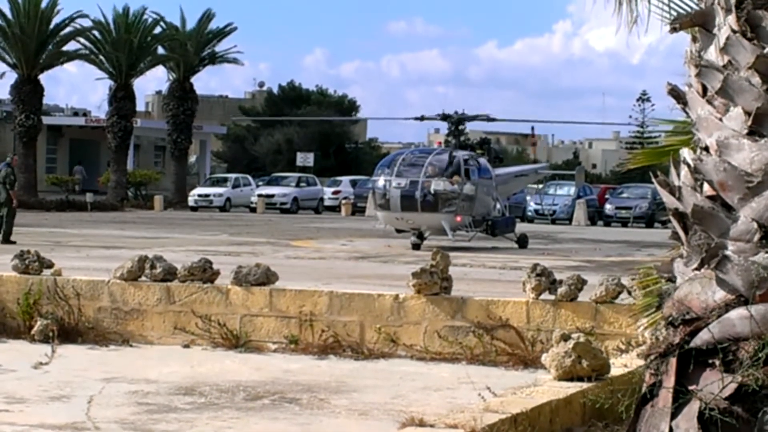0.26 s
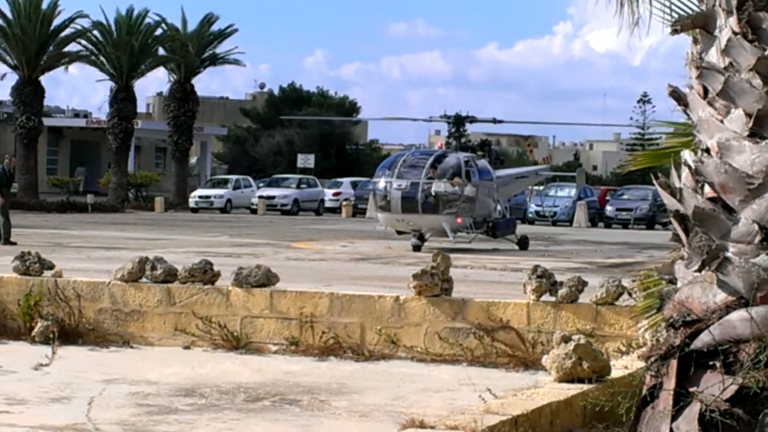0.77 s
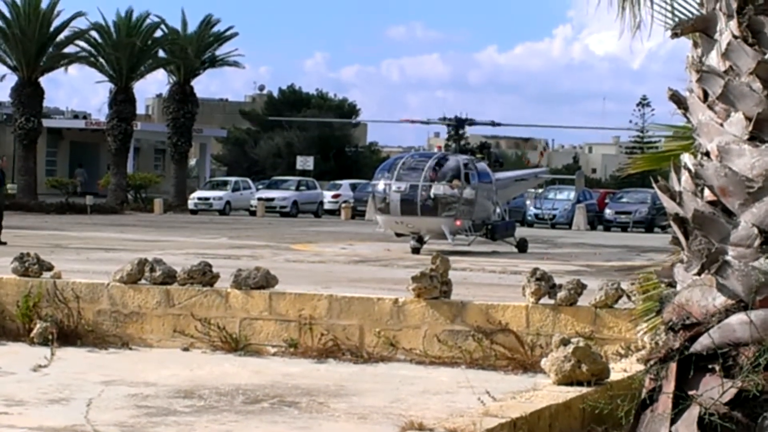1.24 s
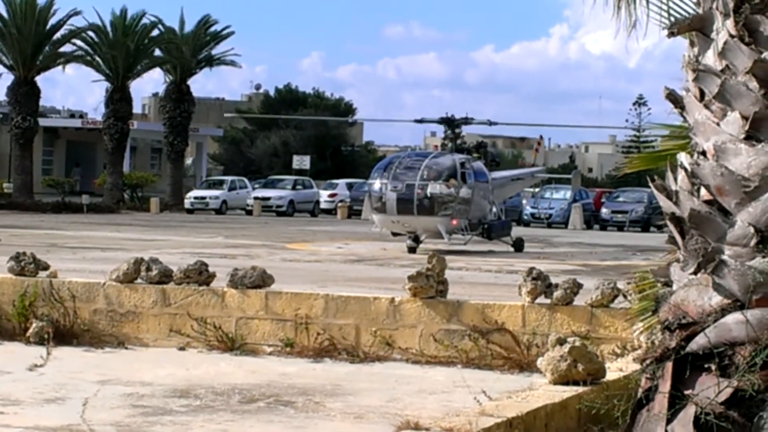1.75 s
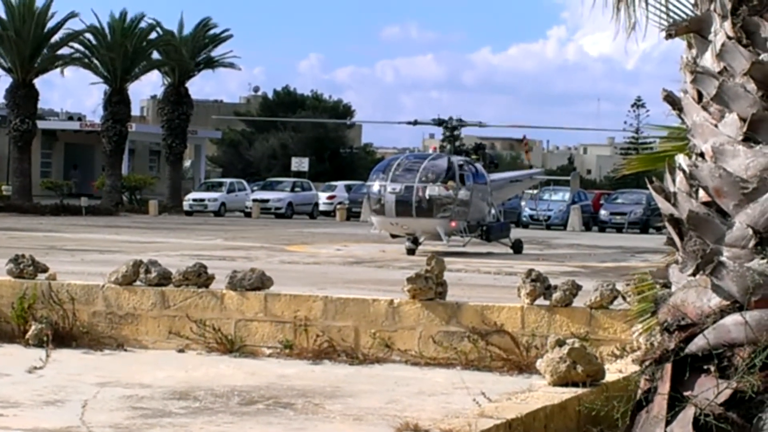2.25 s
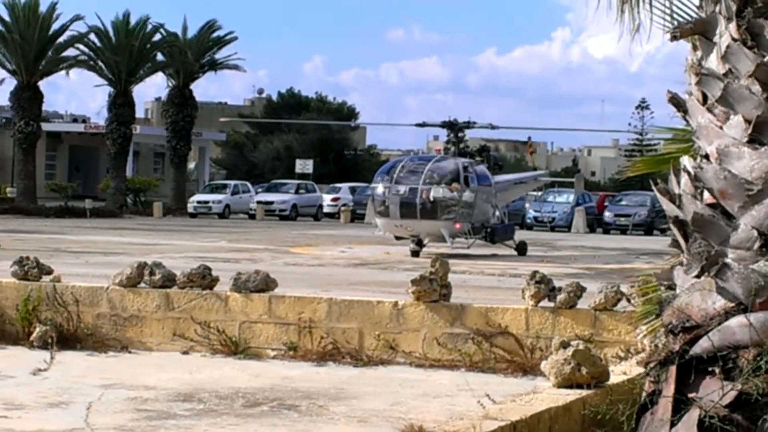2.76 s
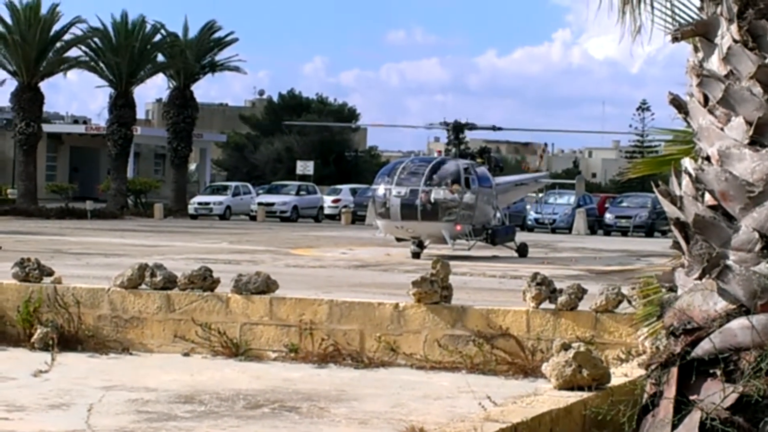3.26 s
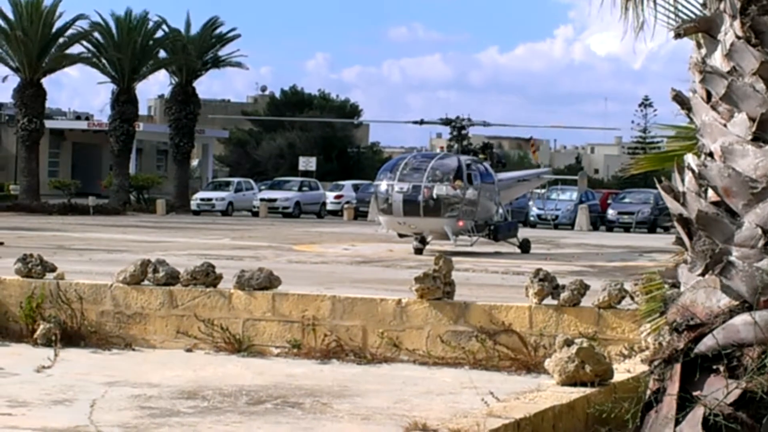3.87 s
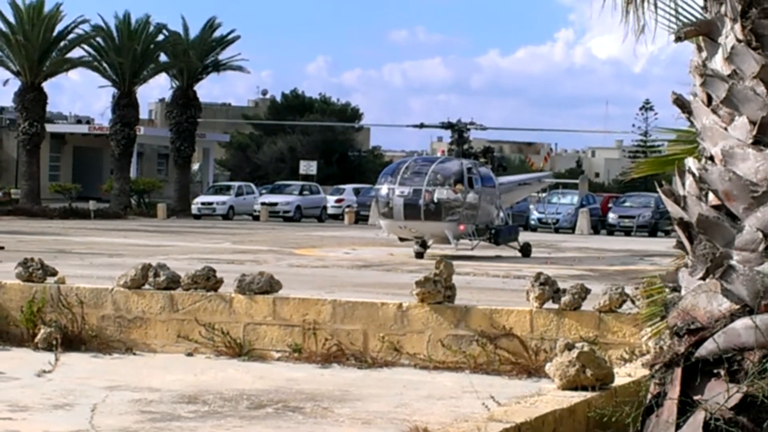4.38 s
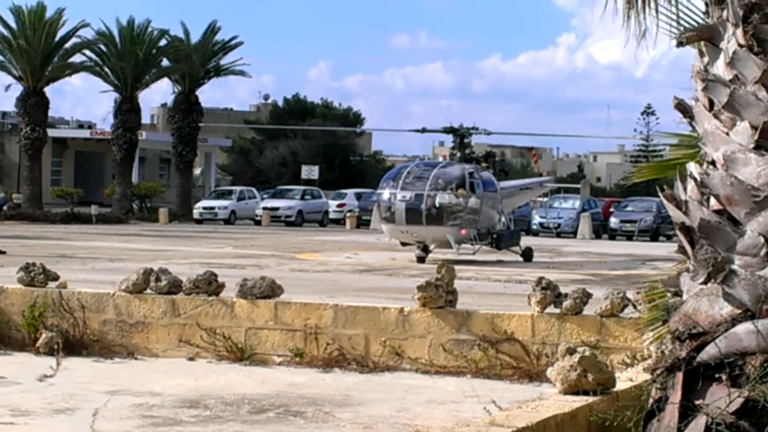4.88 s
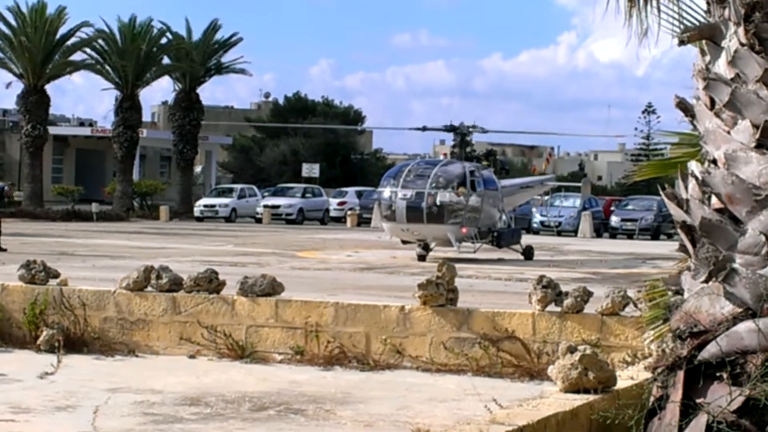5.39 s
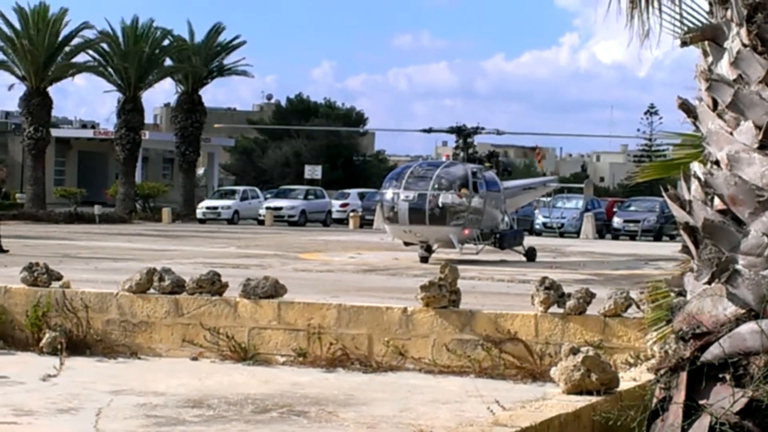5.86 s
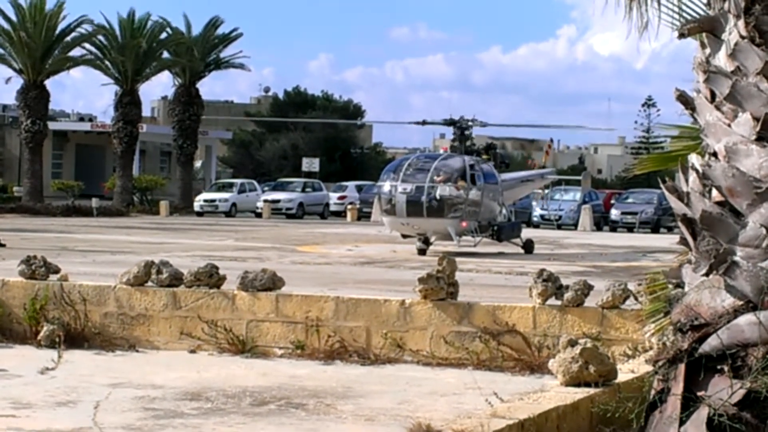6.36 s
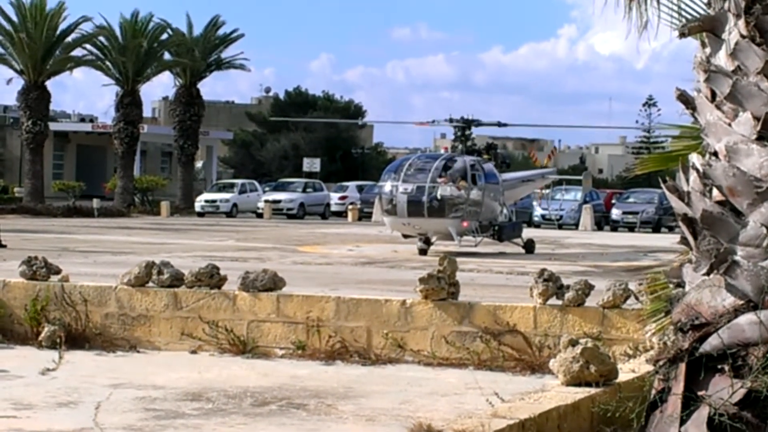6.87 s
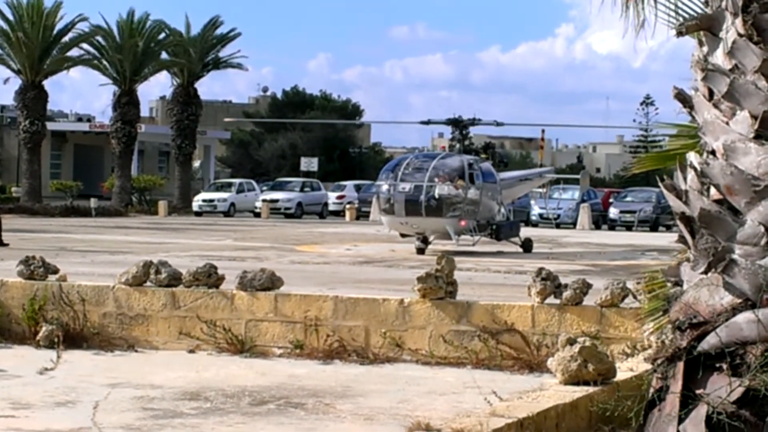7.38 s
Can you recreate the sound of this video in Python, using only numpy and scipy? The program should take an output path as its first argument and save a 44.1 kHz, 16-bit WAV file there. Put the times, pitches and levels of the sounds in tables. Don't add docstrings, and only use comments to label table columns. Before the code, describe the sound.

Continuous turbine whine from a grounded helicopter, near five kilohertz, thin and shrill, with fainter steady tones above and below. A hissing, roaring airflow fills the space beneath it. About eight to eleven times a second, a rotor blade throws back a short downward-sweeping echo. Gusts and hot air make the whine shimmer and fade. Open car park, small distant microphone, slightly coloured by reflections, no deep thumping.

```python
import sys
import numpy as np
from scipy import signal
from scipy.fft import rfft, irfft, next_fast_len
from scipy.io import wavfile
from scipy.ndimage import uniform_filter1d

SR = 44100
rng = np.random.default_rng(int(sys.argv[2]) if len(sys.argv) > 2 else 0)


def unload_audio(sound):
    columns = np.transpose(np.atleast_2d(sound))
    steps = np.round(np.clip(columns, -1, 1) * 32767)
    wavfile.write(sys.argv[1], SR, steps.astype(np.int16))


def amplitude_ratio(level_db):
    exponent = np.asarray(level_db, float) / 20
    return 10 ** exponent


N = 336483
PAD = next_fast_len(N)
TIME = np.arange(N) / SR
THIRDS = [0, TIME[-1] / 2, TIME[-1]]  # start, middle and end in s
SLOW_SR = 1050
SLOW = np.arange(int(TIME[-1] * SLOW_SR) + 2) / SLOW_SR


def whine(turns):
    # [t/s, level/dB]
    blade_tone = [(0.0, -14.0), (0.17, -19.5), (0.95, -10.0), (1.6, -7.5), (2.7, -12.0), (2.75, -17.5),
                  (3.79, -25), (3.92, -16.5), (5.12, -14.0), (5.18, -21), (5.82, -13.0), (6.39, -11.5),
                  (7.4, -32), (7.63, -18.0)]
    # [t/s, half length/s, level/dB]
    eddies = [(0.47, 0.061, -3.5), (0.6, 0.099, 3), (0.87, 0.027, -2.0), (1.1, 0.055, -2.5),
              (1.58, 0.1, -4.5), (1.62, 0.044, 5), (1.81, 0.049, 2.0), (2.19, 0.038, 2.5),
              (2.35, 0.051, -2.0), (3.17, 0.16, 9), (3.24, 0.033, -5.5), (3.56, 0.027, 11),
              (3.67, 0.034, 7.5), (4.18, 0.025, 3), (4.38, 0.13, -4), (4.52, 0.038, -4.5),
              (4.68, 0.03, 2.5), (4.98, 0.048, -5.5), (5.35, 0.057, 5.5), (5.71, 0.076, 4.0),
              (6.08, 0.041, 2.5), (6.35, 0.018, -6), (6.62, 0.027, 3.5), (6.82, 0.036, 6.5),
              (6.94, 0.028, 4.5), (7.03, 0.021, 7.5), (7.15, 0.052, 8.5), (7.42, 0.07, 14.0),
              (4.31, .03, -3), (7.3, .05, -6)]
    # [multiple of shaft, level at start/dB, level at end/dB]
    upper_tones = [
        (16, -46, -44.5),
        (22, -61, -55.5),
    ]
    lower_tones = [(2, -63, -60.5), (3, -54, -47.5), (4, -51, -51), (5, -43.5, -46), (8, -46, -49)]
    # [t/s, half length/s, level/dB, multiple of shaft]
    upper_fades = [(0.24, 0.14, -10, 16), (1.3, 0.059, -12, 16), (1.757, 0.254, 8.5, 16),
                   (1.755, 0.095, -17, 16), (2.81, 0.29, 5, 16), (3.12, 0.084, -5.5, 16),
                   (3.669, 0.28, 5, 16), (4.14, 0.36, -6, 16), (4.825, 0.11, 6.5, 16),
                   (5.24, 0.062, -7.5, 16), (5.41, 0.046, 5.5, 16), (5.79, 0.05, -8, 16),
                   (6.08, 0.183, -12, 16), (6.3, 0.35, 8.5, 16), (7.16, 0.109, -2, 16), (7.5, 0.2, 6, 16),
                   (0.63, 0.13, 8, 22), (1.094, 0.19, 11.5, 22), (1.59, 0.18, 10.5, 22),
                   (1.93, 0.05, 10.5, 22), (2.473, 0.32, 7.5, 22), (2.85, 0.046, -13, 22),
                   (3.29, 0.188, 8.5, 22), (3.69, 0.048, 8, 22), (4.1, 0.116, -7, 22), (4.66, 0.058, 5, 22),
                   (5.462, 0.045, 7, 22), (5.8, 0.04, 6.0, 22), (5.93, 0.046, 7, 22), (6.23, 0.21, 8.5, 22)]
    lower_fades = [(3.95, 1, 11, 2), (5.4, 0.45, 7, 2), (7.5, .4, 6, 2), (0, .15, -12, 3),
                   (3.09, 0.85, 7.5, 3), (4.75, .31, -3, 3), (6.38, .34, -15, 3), (7.54, .15, 3, 3),
                   (.48, .18, -4.5, 4), (2.15, .23, 3, 4), (3.29, .27, 5, 4), (4.45, .11, 6, 4),
                   (5.67, .3, -3, 4), (7.62, .8, 6.5, 4), (.52, .48, -9.5, 5), (2.1, .64, -6, 5),
                   (2.71, .19, 5, 5), (3.95, .15, 4.5, 5), (4.27, .12, -3, 5), (5.02, .11, -5, 5),
                   (5.31, .19, 2.5, 5), (6.49, .11, -7, 5), (.03, .28, -10, 8), (.92, .17, 5, 8),
                   (2.31, .11, -12, 8), (2.61, .15, 5, 8), (3.52, .22, 2.5, 8), (4.45, .19, -11, 8),
                   (5.78, .31, -5.5, 8), (7.35, .45, 8, 8)]

    level_db = curve(blade_tone)[0] + np.interp(TIME, SLOW, swells(eddies))
    near = amplitude_ratio(level_db) * (1 + amplitude_ratio(-21) * flutter(width_hz=22))
    scattered = amplitude_ratio(-31.0) * flutter(width_hz=52, shift_hz=29.6)
    scattered = scattered + amplitude_ratio(-32.5) * flutter(width_hz=120, shift_hz=20)
    out = tone(turns, multiple=11) * (near + scattered)

    upper = fading(upper_tones, upper_fades)
    for (multiple, gain), skirt_db, waver in zip(upper, (-14.5, -12), (.3, .45)):
        skirt = amplitude_ratio(skirt_db) * flutter(width_hz=40, shift_hz=16)
        out = out + tone(turns, multiple) * gain * (.95 + waver * flutter(width_hz=12) + skirt)
    for multiple, gain in fading(lower_tones, lower_fades):
        out = out + tone(turns, multiple) * gain * (1.03 + .22 * flutter(width_hz=6))
    return out.real


def blade_echo(turns, hz):
    # [t/s, blades per s]
    rotor = [(0, 7.84), (2, 8.744), (4, 9.536), (6, 10.216), (7.63, 10.687)]
    # [place in the pass 0-1, span/pass, path bend/m, level/dB, phase/turns]
    glints = [
        (-.03, .07, 4.5, 4.5, .15),
        (-.1, .05, 8, -7, .15),
        (.5, .09, 2, -1, 0),
        (.25, .06, 3, -4, .3),
    ]
    # [t/s, lead/turns of blade tone]
    echo_lead = [(0, -.15), (1.9, .46), (2.4, .38), (3.3, .43), (4.2, .04), (5.1, .13), (5.8, -.18),
                 (6.5, -.15), (7.63, 0)]

    coarse = slice(None, None, 8)
    passes = (.378 + np.cumsum(curve(rotor)[0]) / SR)[coarse]
    echo_db = -25.5 - 0.5 * TIME[coarse]
    lead = curve(echo_lead)[0][coarse]
    out = 0
    for centre, span, bend_m, db, phase in glints:
        number = np.round(passes - centre).astype(int)
        chance = rng.standard_normal((number.max() + 1, 2))[number].T
        angle = passes - number - max(centre, 0)
        late = 11 * hz[coarse] * bend_m * angle ** 2 / 343
        flash = np.exp(-((passes - number - centre) / span) ** 2)
        size = flash * amplitude_ratio(echo_db + db + 2.3 * chance[0])
        out = out + size * np.exp(2j * np.pi * (phase + lead + .05 * chance[1] - late))
    out = np.interp(TIME, TIME[coarse], out)
    return (tone(turns, multiple=11) * out * (.95 + .3 * flutter(width_hz=90))).real


def sidelines(turns):
    # [multiple of shaft, early level/dB, middle level/dB, late level/dB]
    orders = [(1.001, -61.5, -54, -46.5), (6, -52.5, -54, -64.5), (6.96, -70, -60.5, -55),
              (9.13, -53, -51.5, -49), (10, -62.5, -49.5, -62), (12, -46, -49, -49), (13, -55, -56, -53.5),
              (14, -50.5, -53, -51), (15.1, -62.5, -58.5, -59), (16.7, -66.5, -69, -65.5),
              (18, -79.5, -76.5, -77), (19, -74, -68.5, -63.5), (20.1, -67.5, -73, -69),
              (21.2, -61.5, -70.5, -80), (23, -70.5, -74.5, -75)]
    out = 0
    for multiple, *db in orders:
        fade = np.interp(TIME, THIRDS, amplitude_ratio(np.array(db))) * (0.95 + 0.5 * flutter(width_hz=1.6))
        out = out + (tone(turns + rng.random(), round(multiple)) * fade).real
    return out


def rush():
    # [f/Hz, level/dB per Hz]
    bed_curve = [(25, -48), (40, -31.5), (55, -17.5), (110, -17), (300, -11.5), (700, -13.5), (1150, -16.5),
                 (2000, -12), (3100, -15), (4800, -8.5), (5900, -15.5), (7200, -25), (8500, -30),
                 (10500, -33)]
    # [delay/s, level/dB, clearest f/Hz, width/Hz]
    walls = [(.0068, -29.5, 497, 1490), (.0113, -20, 500, 1500), (.0297, -16, 3300, 1513),
             (.0325, -9.5, 1875, 1300), (0.0317, -14, 302, 700), (.0343, -14.5, 1880, 1300),
             (.0361, -13, 1900, 1300)]
    # [t/s, level/dB]
    flow = [(0, -3), (0.4, -2.5), (0.65, -1), (1.4, .5), (2.35, 2.5), (3.3, 2), (4.3, 0), (4.8, 0),
            (5.5, -0.3), (6.1, 0), (6.6, -0.5), (7.2, 2), (7.63, 2)]
    band_hz = [300, 1900, 5000, 8300]
    flow_shares = [-0.0049, .7, 1, 1.1]
    # [f/Hz, width/Hz, level over the bed/dB, drift/dB per s]
    flow_humps = [(185, 118, 10, 0), (245.5, 36, 6, 0), (402, 213, 5.5, 0.2), (634, 67, 1.5, 0),
                  (950, 186, 4.5, 0.03), (1247, 190, -3.2, 0.8), (1435, 230, 10, -.05),
                  (1622, 210, 5.5, 0.2), (1862, 100, 2, -1), (2141, 202, 6, -0.56), (2345, 120, 3, -0.2),
                  (2613, 150, 2, -1), (2864, 190, -1, -1.2),
                  (3103, 210, 2.5, -.05), (3520, 190, 4, -0.33), (3785, 170, -2.8, .3),
                    (4200, 400, 1.7, .2), (4526, 340, 8.5, -0.17), (5030, 160, 5.5, .05),
                    (5300, 370, 10, -.45), (5750, 230, 7, -.25), (5980, 180, 2.5, .05), (6430, 510, 5, .1),
                    (7050, 230, -0.3, -.25), (7700, 160, -1, -.3), (8400, 190, 1.2, .05),
                    (9720, 500, 2.5, -.05)]

    hz = np.maximum(np.fft.rfftfreq(PAD, 1 / SR), 1)
    bed_hz, bed_db = np.transpose(bed_curve)
    bed = amplitude_ratio(np.interp(np.log(hz), np.log(bed_hz), bed_db))
    ripple = 1
    for delay_s, db, mid_hz, width_hz in walls:
        reach = (2 * (hz - mid_hz) / width_hz) ** 4
        ripple = ripple + amplitude_ratio(db) * np.exp(-2j * np.pi * hz * delay_s - reach)
    bed = bed * ripple
    bed = bed * (1 - amplitude_ratio(-18.5) * np.exp(-2j * np.pi * hz * 0.003613 - (hz / 3800) ** 4))

    flow_db = np.interp(SLOW, *np.transpose(flow))
    out = 0
    for band, follows in enumerate(flow_shares):
        share = np.interp(np.log(hz), np.log(band_hz), np.arange(4) == band)
        out = out + coloured(bed * np.sqrt(share), follows * flow_db + 0.53 * walk(9))
    for centre_hz, width_hz, db, drift_db in flow_humps:
        bell = np.exp(-(2 * (hz - centre_hz) / width_hz) ** 2)
        breath_db = db + drift_db * (SLOW - THIRDS[1]) + .7 * walk(1.5) + 1.3 * walk(8)
        follows = np.interp(centre_hz, band_hz, flow_shares)
        out = out + coloured(bed * bell, follows * flow_db + breath_db)
    return out * amplitude_ratio(-28) / np.sqrt(np.mean(out ** 2))


def tone(turns, multiple):
    return np.sqrt(2) * np.exp(2j * np.pi * multiple * turns)


def flutter(width_hz, shift_hz=0):
    hz = np.fft.fftfreq(len(SLOW), 1 / SLOW_SR)
    z = rng.standard_normal(len(hz)) + 1j * rng.standard_normal(len(hz))
    z = z / (1 + ((hz - shift_hz) / width_hz) ** 2)
    return np.interp(TIME, SLOW, np.fft.ifft(z) * len(hz) / np.sqrt(np.sum(abs(z) ** 2)))


def fading(levels, fades):
    out = []
    for multiple, first_db, last_db in levels:
        own = [row[:-1] for row in fades if round(row[-1]) == round(multiple)]
        db = np.linspace(first_db, last_db, len(SLOW)) + swells(own)
        out.append((round(multiple), np.interp(TIME, SLOW, amplitude_ratio(db))))
    return out


def swells(rows):
    return sum(db * np.exp(-((SLOW - s) / half_s) ** 2) for s, half_s, db in rows)


def curve(table):
    s, *columns = np.transpose(table)
    return [np.interp(TIME, s, c) for c in columns]


def walk(rate):
    k = int(SLOW_SR / rate)
    held = np.repeat(rng.standard_normal(len(SLOW) // 8), k)[:len(SLOW)]
    return 0.91 * uniform_filter1d(uniform_filter1d(held, k), k)


def coloured(shape, db):
    noise = irfft(shape * np.exp(2j * np.pi * rng.random(len(shape))), PAD)[:N]
    return noise * np.interp(TIME, SLOW, amplitude_ratio(db))


def scene():
    # [t/s, turns per s]
    shaft = [(0, 438.3), (1, 438.1), (2, 438.33), (3, 438.72), (4, 439.12), (5, 439.5), (6, 440.05),
             (7, 440.55), (7.63, 440.8)]
    hz = curve(shaft)[0]
    turns = .02 + np.cumsum(hz) / SR
    return (whine(turns) + blade_echo(turns, hz) + sidelines(turns) + rush())[None]


def top_cut(x):
    return signal.sosfilt(signal.butter(12, 10770, fs=SR, output="sos"), x)


def record(dry):
    edge = np.clip((10500 - np.fft.rfftfreq(PAD, 1 / SR)) / 110 + 1, 0, 1) ** 4
    mix = irfft(rfft(dry, PAD) * edge, PAD)[:, :N]
    return top_cut(mix)


dry = scene()
out = record(dry)
unload_audio(out)
```